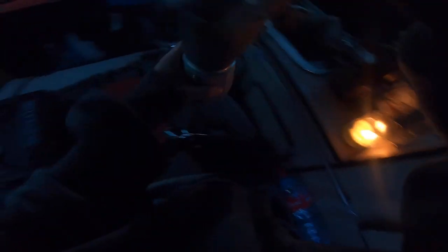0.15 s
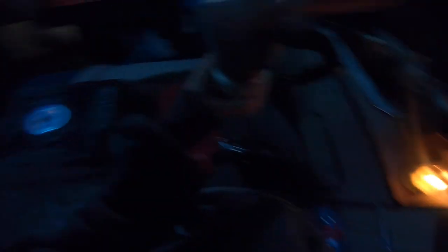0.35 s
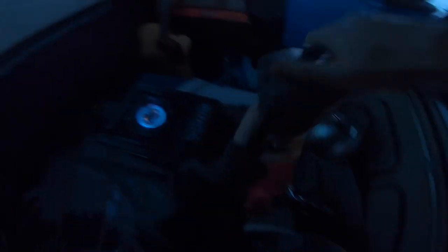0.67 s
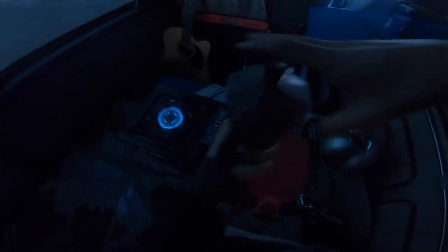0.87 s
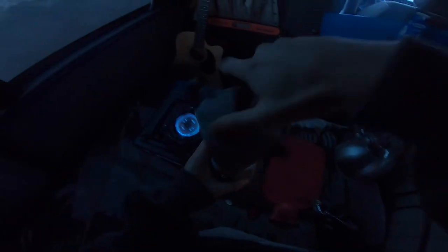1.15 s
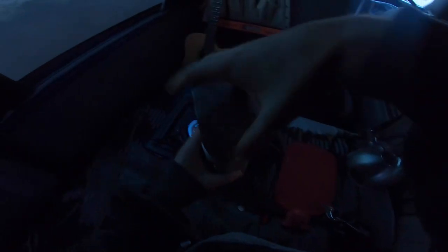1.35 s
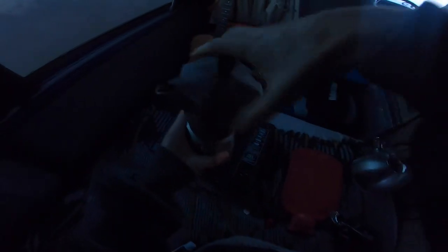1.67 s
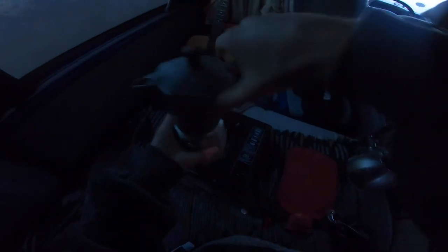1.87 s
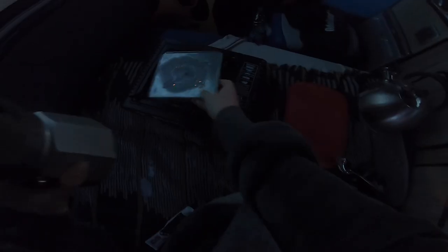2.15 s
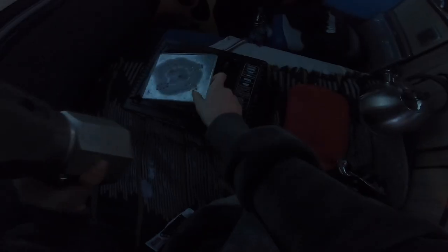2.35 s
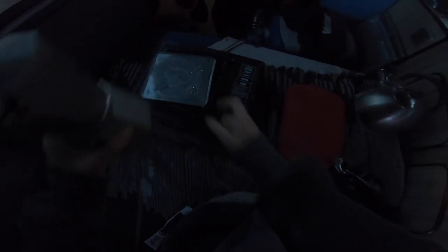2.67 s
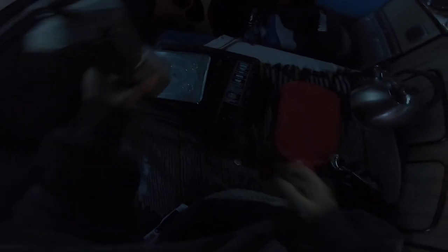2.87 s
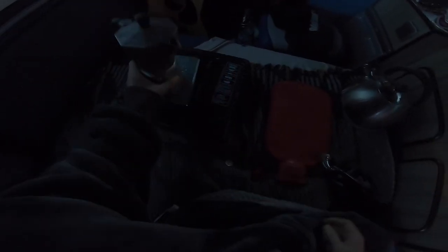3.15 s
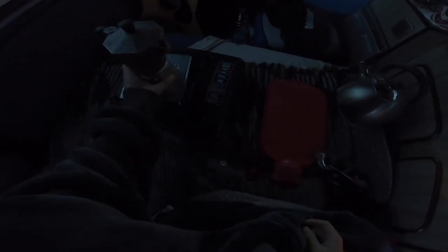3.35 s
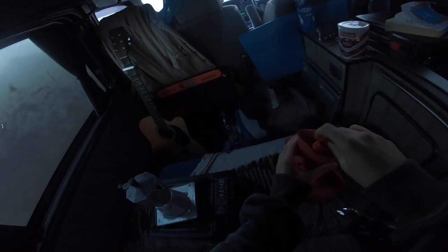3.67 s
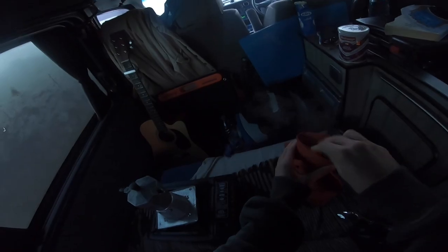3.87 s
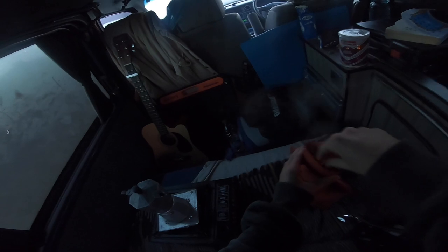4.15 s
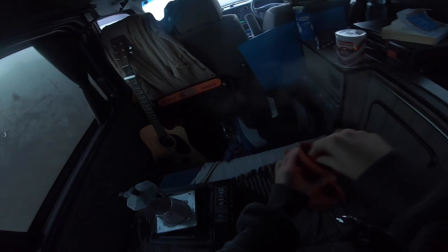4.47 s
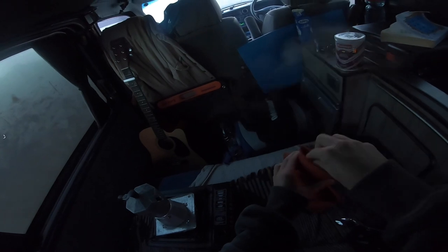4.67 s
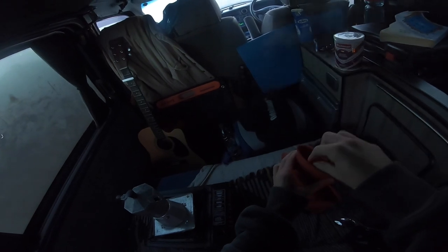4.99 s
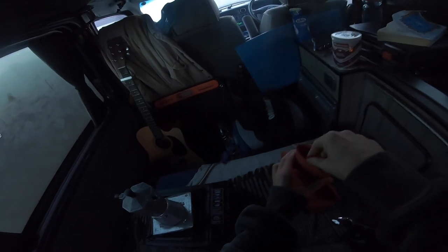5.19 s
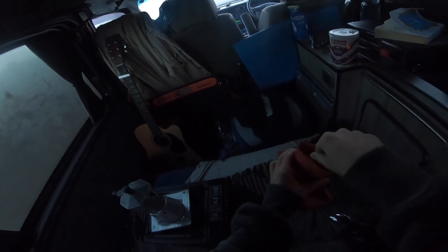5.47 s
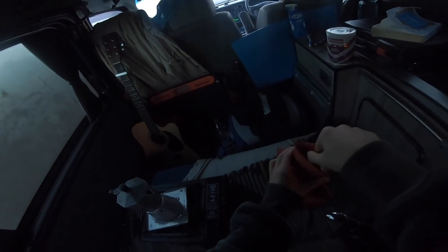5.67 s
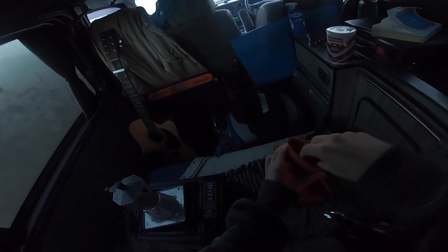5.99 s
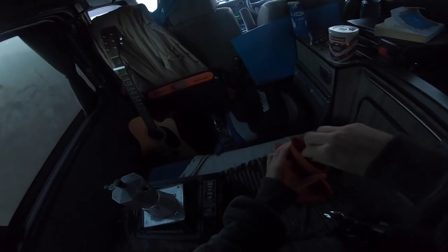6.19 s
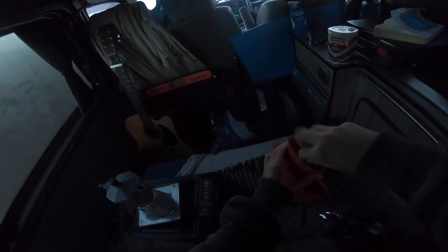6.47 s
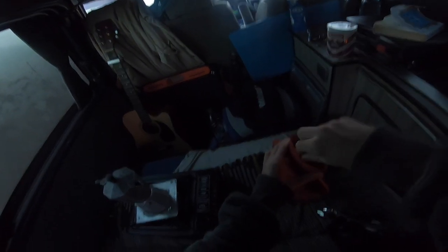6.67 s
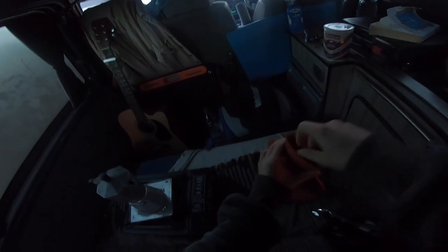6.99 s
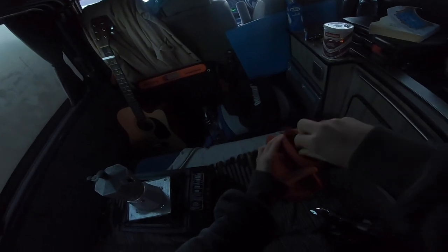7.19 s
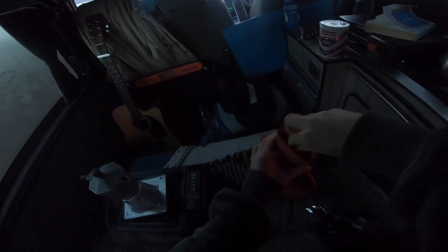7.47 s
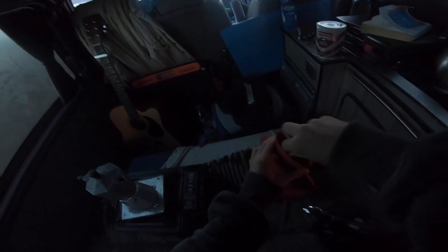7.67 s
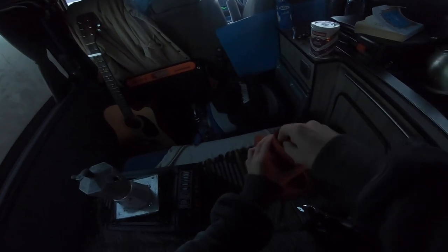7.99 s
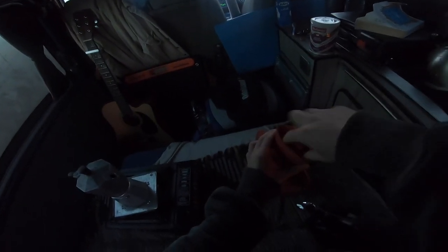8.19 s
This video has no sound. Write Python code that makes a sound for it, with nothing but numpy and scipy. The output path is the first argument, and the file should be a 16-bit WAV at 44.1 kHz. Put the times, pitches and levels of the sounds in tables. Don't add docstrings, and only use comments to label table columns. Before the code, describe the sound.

Inside a small van, faint gas hiss, metallic pot scrapes and clacks, loud lid clatter, then soft plastic ticking and rubbery rubbing over low rumble.

```python
import sys
import numpy as np
from scipy import signal
from scipy.fft import rfft, irfft, next_fast_len
from scipy.io import wavfile
from scipy.ndimage import uniform_filter1d, map_coordinates

SR = 44100
rng = np.random.default_rng(int(sys.argv[2]) if len(sys.argv) > 2 else 0)


def to_linear_factor(level_db):
    exponent = np.asarray(level_db, float) / 20
    return 10 ** exponent


def dump(signal):
    limited = np.clip(np.atleast_2d(signal).T, -1, 1)
    pcm = np.round(limited * 32767).astype(np.int16)
    wavfile.write(sys.argv[1], SR, pcm)


N = 367787
TIME = np.arange(N) / SR

# (frequency [Hz], level [dB], t60 [s])
POT_MODES = [(2152, 1.5, .06), (5510, -11, .04), (3170, 0, .055), (3650, -11, 0.06), (4540, -17, .05)]
# (frequency [Hz], level [dB], t60 [s])
POT_HOLLOW = [(371.5, 10, 0.03), (168.4, -8, 0.047), (710, -6, 0.037)]
# (frequency [Hz], density [dB per Hz])
LID_COLOUR = [(59, -47), (100, -14), (281, -17.5), (429, -12.5), (654, -20), (998, 1), (1160, -15.5),
              (1340, 0.5), (1880, -0.5), (2220, 1), (3120, 3), (9740, -25.5), (15500, -62.5)]
# (frequency [Hz], level [dB], t60 [s])
THUMP = [(62.4, 1, 0.17), (99, -2, 0.095)]
# (frequency [Hz], level [dB], t60 [s])
STOPPER = [(790, -12, 0.013), (1528, -17.5, 0.018), (1950, -4.5, 0.0082), (3914, -27, 0.027)]
# (frequency [Hz], level [dB], t60 [s])
RUBBER = [(308.5, 2, 0.04), (218, 1.5, 0.024), (399, 0, 0.016)]


def rms_one(x):
    return x / np.sqrt(np.mean(x ** 2) + 1e-20)


def at_hz(points, hz):
    points_hz, points_db = np.transpose(points)
    return np.interp(np.log(hz + 1), np.log(points_hz), points_db)


def high(x, hz, order=2):
    return signal.sosfilt(signal.butter(order, hz, "high", fs=SR, output="sos"), x)


def brightened(x, hz, db):
    low = signal.sosfilt(signal.butter(3, hz, fs=SR, output="sos"), x)
    return low + high(x, hz, order=3) * to_linear_factor(db)


def coloured(x, spectrum, size=4096):
    bins_hz = np.arange(size // 2 + 1) * SR / size
    cepstrum = irfft(np.log(to_linear_factor(at_hz(spectrum, bins_hz))))
    cepstrum[1:size // 2] *= 2
    cepstrum[size // 2 + 1:] = 0
    taps = irfft(np.exp(rfft(cepstrum)))
    return signal.fftconvolve(x, taps / np.sqrt(np.sum(taps ** 2)))[:len(x)]


def drift(rate):
    knots = rng.standard_normal(4000)
    return map_coordinates(knots, [TIME * rate * 2 + 2], order=3)


def smoothed(gain):
    return signal.lfilter([.02], [1, -.98], gain)


def strokes(tables, column):
    out = np.zeros(N)
    for rows in tables:
        s, db = np.array(rows)[:, 0], np.array(rows)[:, column]
        active = (TIME >= s[0]) & (TIME < s[-1])
        out += to_linear_factor(np.interp(TIME, s, db)) * active
    return smoothed(out)


def swells(start, full, release, db, fall, rise_db):
    t = TIME[::20, None]
    rise = rise_db * np.clip((full - t) / (full - start), 0, 1)
    level = db - rise - fall * np.clip(t - release, 0, 1)
    gain = np.sum(to_linear_factor(level) * (t >= start), axis=1)
    return smoothed(np.repeat(gain, 20)[:N])


def grains(per_s, spread_db):
    sizes = to_linear_factor(spread_db * np.minimum(rng.exponential(1, N), 4)) * rng.choice([-1, 1], N)
    return rms_one(sizes * (rng.random(N) < per_s / SR))


def resound(x, modes, damping=0.98):
    out = np.zeros(len(x))
    for k, (hz, db, t60) in enumerate(modes):
        r = to_linear_factor(-60 / (t60 * damping * SR))
        w = 2 * np.pi * hz / SR
        ring = signal.lfilter([0, np.sin(w)], [1, -2 * r * np.cos(w), r * r], x + 1e-18)
        out += (-1) ** k * to_linear_factor(db) * ring
    return out


def bands(x, peaks, apart=0.47):
    t = TIME[:6000]
    hz, width, db = np.transpose(peaks)[:, :, None]
    phases = apart * rng.uniform(-0.69, 1, (2, len(peaks), 1))
    decay = to_linear_factor(db) * width * np.exp(-np.pi * width * t)
    taps = np.sum(decay * np.sin(2 * np.pi * hz * t + phases), axis=1)
    taps /= np.sqrt(np.mean(np.sum(taps ** 2, axis=1)))
    return signal.fftconvolve(x[None], taps, axes=1)[:, :N]


def struck(modes, uneven_db, length_s, rise_s):
    t = TIME[:int(length_s * SR)]
    out = np.zeros(len(t))
    for hz, db, t60 in modes:
        level = db + uneven_db * rng.standard_normal() - 60 * t / t60
        out += to_linear_factor(level) * np.sin(2 * np.pi * hz * t)
    out *= 1 - np.exp(-t / rise_s)
    return out / np.abs(out).max()


def crack(spectrum, t60, click_db, bright_db):
    t = TIME[:4000]
    burst = rng.standard_normal(len(t)) * to_linear_factor(-60 * t / t60)
    burst[0] = -to_linear_factor(click_db)
    out = brightened(coloured(burst, spectrum), 4600, bright_db)
    return out / np.abs(out).max()


def panned(x, pan_db):
    return np.array([x * to_linear_factor(pan_db / 2), x * to_linear_factor(-pan_db / 2)])


def add(out, s, sound, pan_db):
    i = round(s * SR)
    out[:, i:i + len(sound)] += panned(sound, pan_db)[:, :N - i]


def stereo_noise(spectrum, patchy_db, peaks=(), peak_db=0):
    # (frequency [Hz], left-right likeness [1])
    likeness = [(60, 0.71), (180, 0.1), (550, -7.5), (1650, 0.27), (4970, 0.97), (15000, -2)]
    size = next_fast_len(N)
    hz = np.arange(size // 2 + 1) * SR / size
    resonances = sum(to_linear_factor(db + peak_db) / (1 + (2 * (hz - f) / w) ** 2) for f, w, db in peaks)
    gain = to_linear_factor(at_hz(spectrum, hz)) * (1 + resonances)
    alike = np.clip(at_hz(likeness, hz), 0, 1)
    mid, side = rfft(rng.standard_normal((2, size))) * gain * np.sqrt([1 + alike, 1 - alike])
    noise = irfft([mid + side, mid - side], size)[:, :N]
    return rms_one(noise * to_linear_factor(patchy_db * drift(9.3)))


def flame():
    # (time [s], level [dB])
    hiss_level = [
        [(0, -61.5), (.76, -64.5), (.82, -70.5), (1.06, -75), (1.37, -70), (1.46, -79.5), (2.0, -70.5),
         (2.08, -63), (2.25, -63.5)],
        [(2.7, -63), (3.0, -66), (3.3, -66.5)],
    ]
    # (frequency [Hz], density [dB per Hz])
    hiss_colour = [(59, -48), (110, -35), (170, -8), (299, 2.5), (568, -5), (1080, -5), (2470, -13),
                   (2970, -12), (5300, -16.5), (6200, -13.5), (6930, -24.5), (8600, -28.5), (10300, -49),
                   (14000, -80)]
    # (time [s], pitch [Hz], level [dB])
    whistle = [
        [(0, 6350, -61), (.035, 6600, -61), (.075, 6100, -60), (.1, 6000, -63), (.13, 6600, -64),
         (.165, 6650, -65), (.2, 6300, -70), (.3, 6150, -64), (.42, 6100, -72)],
        [(.46, 5900, -72), (.52, 6000, -64), (.55, 6150, -62), (.6, 5900, -64), (.68, 5850, -65),
         (.72, 6100, -62), (.79, 6080, -72)],
    ]
    hiss = strokes(hiss_level, column=1) * to_linear_factor(9.5) * stereo_noise(hiss_colour, patchy_db=4.5)
    s, hz, _ = np.vstack(whistle).T
    pitch = uniform_filter1d(np.interp(TIME, s, hz), size=500) + 90 * drift(250)
    phase = 2 * np.pi * np.cumsum(pitch) / SR
    return hiss + strokes(whistle, column=2) * np.sin(phase) * to_linear_factor(4 * drift(50))


def cabin_noise():
    # (frequency [Hz], density [dB per Hz])
    colour = [(13, -30.5), (22, -2), (59, 1), (99, -27), (153, -3), (286, -2), (551, -15.5), (765, -8),
              (1060, -18), (1940, -8.5), (2470, -18.5), (3940, -15), (6980, -24.5), (9430, -20),
              (10600, -25.5), (12700, -33.5), (13300, -46), (15000, -53.5)]
    # (frequency [Hz], width [Hz], level [dB])
    peaks = [(743, 45, -4), (1542, 85, -1), (3820, 320, -10), (4880, 55, -5), (7140, 24, -5.5)]
    airy_s, hush_s = 3.68, 3.58
    noise = to_linear_factor(-65) * stereo_noise(colour, 0.99, peaks, peak_db=3.5)
    noise = brightened(noise, 8000, -16 * (TIME < airy_s))
    noise = brightened(noise, 3500, -12 * ((TIME > hush_s) & (TIME < airy_s)))
    lull_db = -6 * ((TIME > 2.0) & (TIME < 3.45))
    return brightened(noise * to_linear_factor(lull_db), 75, -lull_db)


def chatter(per_s, spectrum, cycles, count=16):
    slips = grains(per_s, spread_db=5.0)
    dealt = rng.integers(0, count, N)
    out = np.zeros(N)
    for k, hz in enumerate(np.geomspace(1300, 4200, count)):
        mode = (hz, at_hz(spectrum, hz) + 20 * np.log10(hz), cycles / hz)
        out += resound(slips * (dealt == k), [mode])
    return rms_one(out)


def pot_thread():
    # (start [s], full [s], release [s], grind level [dB], decay [dB per s])
    turns = [
        (0.195, 0.253, 0.33, -40, 212),
        (0.592, 0.694, 0.76, -41, 900),
        (1.086, 1.162, 1.245, -40, 266.5),
        (1.497, 1.562, 1.636, -37, 600),
    ]
    # (start [s], length [s], grind level [dB], hollow level [dB])
    fumbles = [
        (0, 0.011, -56, -50.5),
        (0.037, 0.15, -68, -60.5),
        (0.389, 0.011, -68, -44),
        (0.796, 0.094, -66, -45),
        (1.291, 0.15, -72, -66),
        (1.683, 0.038, -81, -46.5),
    ]
    # (frequency [Hz], density [dB per Hz])
    colour = [(290, -7), (500, 1.5), (1390, -2), (2100, -4.5), (3190, -4.5), (4020, -14), (6000, -5),
              (7030, -15.5), (9650, -16), (11000, -37.5), (15500, -60)]
    # (frequency [Hz], width [Hz], level [dB])
    singing = [(1650, 130, -10), (2400, 350, -5.5), (3440, 250, -14.5), (4530, 170, -14.5), (6045, 100, -9),
               (7600, 130, -18), (8660, 91, -27), (9610, 200, -17)]
    hollow_rise_db, fumble_fall = 17.5, 400
    slips = grains(9000 * to_linear_factor(4 * drift(70)), spread_db=2.3)
    grind = to_linear_factor(-6) * coloured(slips, colour)
    grind += to_linear_factor(-12) * rms_one(resound(slips + 1.2 * grains(140, spread_db=4.0), POT_MODES))
    grind = grind + to_linear_factor(-2.5) * chatter(800, colour, cycles=33)
    grind += to_linear_factor(-8) * bands(slips, singing)[0]
    jolts = signal.lfilter([1], [1, -.9], grains(160, spread_db=3.5))
    hollow = rms_one(resound(jolts, POT_HOLLOW))
    start, full, release, db, fall = np.transpose(turns)
    grind_gain = swells(start, full, release, db, fall, rise_db=23)
    hollow_gain = swells(start, release, release, db + 3, fall, hollow_rise_db)
    s, length, db, hollow_db = np.transpose(fumbles)
    grind_gain += swells(s, s + length / 2, s + length, db, fumble_fall, rise_db=4)
    hollow_gain += swells(s, s + length, s + length, hollow_db, fumble_fall, hollow_rise_db)
    return panned(grind_gain * grind + hollow_gain * hollow, 0.67)


def pot_knocks():
    # (time [s], peak [dB], hollow level [dB], ring level [dB])
    base_knocks = [(0.149, -39, -33, -34), (.213, -38, -35, -25), (0.3315, -20.5, -42, -12.5),
                   (0.356, -15.5, -20.5, -11.5), (0.526, -37, -36.5, -36), (0.603, -37.5, -25.5, -39),
                   (.727, -24, -33, -20), (0.743, -26.5, -28, -6), (.755, -50, -28, -21),
                   (0.872, -26, -38, -23), (0.882, -17.5, -23, -11), (0.904, -48, -44, -19),
                   (1.1119, -26, -33, -21), (1.123, -29, -37, -20), (1.173, -27, -23.5, -22),
                   (1.21, -36, -27, -20), (1.417, -27.5, -35.5, -11), (1.509, -14.5, -23.5, -26),
                   (1.747, -47, -47, -26), (1.897, -15, -19.5, -18), (1.9056, -4, -28.5, -26),
                   (1.91, -12.5, -22.5, -11.5)]
    # (time [s], peak [dB], hollow level [dB], ring level [dB])
    top_knocks = [(0.4228, -15.5, -38, -6.5), (0.846, -43, -42, -1), (1.084, -41, -45.5, -21),
                  (1.091, -41, -43, -29), (1.149, -38, -38, -2), (1.163, -26, -30, -8.5),
                  (1.19, -17, -24, -15), (1.232, -20.5, -32.5, -10.5), (1.566, -13, -32, -5),
                  (1.67, -27, -36, -14), (1.838, -24.5, -30, -4.5), (1.842, -18, -29.5, -9),
                  (1.865, -10.5, -24.5, -17.5), (1.954, -9, -27.5, -22), (2.04, -41, -43, -13),
                  (2.0458, -14.5, -70, -12)]
    # (frequency [Hz], density [dB per Hz])
    colour = [(240, -18.5), (400, 0), (942, -0.5), (1960, 3), (3460, -6.5), (6190, -13), (7100, -23),
              (9210, -29.5), (10700, -42), (15500, -47)]
    # (frequency [Hz], level [dB], t60 [s])
    treble = [(6130, 3.5, .022), (6420, -6.5, .02), (7720, -4, .04), (8040, -6.5, 0.019), (9570, -6, 0.023)]
    # (frequency [Hz], level [dB], t60 [s])
    push = [(165.3, 0, 0.096)]
    # (time [s], left over right [dB])
    place = [(.15, 2), (.33, 8.5), (.43, 5.5), (.52, 0), (1.19, -3.5), (1.5, 1.5), (2.05, 2.5)]
    far_half_db = -7.5
    out, pushes, taps = np.zeros((2, N)), np.zeros((2, N)), np.zeros(N)
    knocks = [row + (0, far_half_db) for row in base_knocks]
    knocks += [row + (far_half_db, 0) for row in top_knocks]
    for s, db, hollow_db, ring_db, base_db, top_db in sorted(knocks):
        pan_db = np.interp(s, *np.transpose(place))
        bright_db = 0.6 * (db + 24)
        ring_db = db + ring_db + 2.5
        add(out, s, to_linear_factor(db - 1) * crack(colour, 0.034, 19, bright_db), pan_db)
        add(out, s, to_linear_factor(ring_db + base_db) * struck(POT_MODES[:2], 0.9, .15, .0004), pan_db)
        add(out, s, to_linear_factor(ring_db + top_db) * struck(POT_MODES[2:], 3.5, .15, .0004), pan_db)
        add(out, s, to_linear_factor(hollow_db + 1) * struck(POT_HOLLOW, 4.5, .1, 0.00175), 0)
        add(pushes, s, to_linear_factor(db + hollow_db - 7) * struck(push, 0, .1, 0.0071), 0)
        taps[round(s * SR)] = to_linear_factor(-12 + 1.9 * db)
    out += panned(resound(taps, treble), 2.5)
    return high(out, 164, order=4) + high(pushes, 120, order=4)


def snaps():
    # (time [s], peak [dB], frequency [Hz], t60 [s])
    contacts = [(0.3316, -24, 2000, .005), (0.845, -41, 5500, .06), (0.8845, -17, 1900, .004),
                (1.112, -28, 1500, .005), (1.1735, -21, 1400, .005), (1.1905, -18, 2500, .004),
                (1.418, -36, 3170, .06), (1.5095, -16, 1900, .004), (1.535, -38, 3170, .07),
                (1.537, -45, 5800, .05), (1.61, -36, 3170, .09), (1.632, -36, 3170, .07),
                (3.3155, -7, 2800, .004), (3.452, -33, 1400, .1), (3.575, -30, 3763, .14),
                (7.745, -52, 1950, .04), (7.93, -48, 1950, .04)]
    out, t = np.zeros((2, N)), TIME[:6000]
    for s, db, hz, t60 in contacts:
        add(out, s, -to_linear_factor(db - 60 * t / t60) * np.sin(2 * np.pi * hz * t), 1.5)
    return out


def sheet(spectrum, t60, count=160):
    t = TIME[:8000]
    place, left, right = rng.random((3, count, 1))
    hz = 600 + 9000 * place ** 1.1
    decay_db = 60 * t / t60 * np.sqrt(hz / 2000)
    modes = to_linear_factor(at_hz(spectrum, hz) - decay_db) * np.sin(2 * np.pi * hz * t)
    taps = np.array([np.sum(modes * (ear - .25), axis=0) for ear in (left, right)])
    return taps / np.sqrt(np.mean(np.sum(taps ** 2, axis=1)))


def lid_drag():
    start_s = [2.253, 2.285, 2.455, 2.517, 2.615, 2.79, 2.945, 3.02, 3.075, 3.31, 3.36, 3.414, 3.511, 3.535]
    # (length [s], rattle level [dB], decay [dB per s], brightness [dB])
    drags = [(0.018, -24.5, 204, 0), (0.1, -25, 199, -9.5), (0.047, -32.5, 400.5, -21),
             (0.072, -21, 250.5, -3), (0.041, -29.5, 184, 0), (0.021, -39, 190, -26),
             (.025, -47.5, 202, -39), (0.021, -49.5, 200.5, -38), (.04, -54.5, 201, -36),
             (0.03, -20.5, 289.5, -8), (.03, -42, 126.5, -16), (0.055, -32.5, 207.5, -16),
             (0.011, -24, 304.5, -14), (0.02, -22.5, 454.5, -16.5)]
    modes_hz = [344, 520, 696, 947, 1030, 1338, 1480, 1753, 1815, 1857, 1884, 2412, 2457, 2919, 3005, 3119,
                3284, 3356, 3450, 3656, 3725, 3988, 4430, 4581, 4915, 5125, 5599, 6240, 6600, 7784, 8737]
    # (level [dB], t60 [s])
    modes_ring = [(-20, 1.1), (-22, .9), (-24, .5), (-17, .5), (-16, .25), (-14, 1.2), (-9, .4), (-12, .4),
                  (-2, .4), (-9, .45), (-4, 1.1), (-15, .9), (-12, .4), (-13, .4), (-13, .8), (-13, .35),
                  (-13, .4), (-12, .6), (-8, .7), (-3, .75), (-14, 1.2), (-9, .75), (-17, .4), (-10, .55),
                  (-15, .6), (-14, .4), (-12, .4), (-15, .4), (-16, .55), (-17, .33), (-18.5, .2)]
    # (frequency [Hz], width [Hz], level [dB])
    sliding = [(1036, 60, -15.5), (1340, 36, -7), (1890, 39.5, 6), (2592, 60, 0), (3025, 49, 0),
               (3220, 22.3, -2.5), (3655, 45, 4.5), (4024, 38, -9), (1490, 20, -3.5), (4810, 32, -12.5),
               (5100, 15, -12), (5480, 120, -14), (5930, 42, -11.5), (6400, 36, -16)]
    # (frequency [Hz], width [Hz], level [dB])
    loaded = [(1351, 50, -9), (1630, 50, -6), (2000, 56, -6.5), (2420, 260, -12.5), (2910, 120, -6),
              (3130, 49, -2.5), (3360, 90, -1), (3740, 60, -1), (3990, 18, -2), (4100, 45, -11),
              (4790, 44, -6.5), (5220, 27, -11), (5500, 80, -10), (6120, 120, -12.5)]
    ring_from_s, release_s, clear_s = 2.54, 2.64, 2.75
    sheet_fade_s, held_s, pot_down_s, still_s = 2.8, 3.15, 3.2, 3.585
    s = np.array(start_s)
    length, db, fall, bright_db = np.transpose(drags)
    contacts = grains(5000 * to_linear_factor(2.5 * drift(90)), spread_db=2.5)
    contacts *= swells(s, s + 0.0069, s + length, db, fall, rise_db=6)
    stroke = np.clip(np.searchsorted(s, TIME) - 1, 0, None)
    clatter = brightened(coloured(contacts, LID_COLOUR), 4790, bright_db[stroke] + 15.5)
    close = signal.fftconvolve(contacts[None], sheet(LID_COLOUR, 0.47), axes=1)[:, :N]
    close *= to_linear_factor(-440 * np.clip(TIME - sheet_fade_s, 0, 1))
    modes = np.column_stack([modes_hz, modes_ring])
    free = panned(to_linear_factor(-47) * resound(contacts * (TIME > ring_from_s), modes), 4.2)
    add(free, release_s, to_linear_factor(-23.5) * struck(modes, 0.56, 1, 0.028), 4)
    free *= to_linear_factor(-300 * np.clip(TIME - held_s, 0, 1))
    damped = to_linear_factor(-3.5) * bands(contacts * (TIME < clear_s), sliding)
    damped += to_linear_factor(-5) * bands(contacts * (TIME > pot_down_s), loaded)
    damped *= to_linear_factor(-400 * np.clip(TIME - still_s, 0, 1))
    return panned(to_linear_factor(-7) * clatter, 1.4) + free + (to_linear_factor(-17) * high(close, 440) + damped) * to_linear_factor([[2], [-2]])


def lid_blows():
    # (time [s], peak [dB], pot ring level [dB], low thump level [dB])
    blows = [(2.253, -4.5, -35, -45), (2.307, -10.5, -19, -57), (2.347, -6.5, -8.5, -49.5),
             (2.455, -20.5, -15.5, -71), (2.516, -2.5, -16, -41.5), (3.309, -19, -10, -46.5),
             (3.3145, -2, -25, -35.5), (3.328, -6, -22.5, -58.5), (3.416, -17, -15, -40.5),
             (3.512, -8.5, -16, -57.5), (3.537, -5, -13, -50.5), (3.563, -23, -25, -39.5)]
    # (frequency [Hz], level [dB], t60 [s])
    settling = [(2153, 1, 0.057), (2643, -22.5, 0.12), (2939, -35.5, 0.33), (3320, -22.5, 0.19),
                (3763, -9, 0.13), (4600, -28.5, 0.11), (5740, -28.5, 0.13), (5669, -28, 0.23)]
    out = np.zeros((2, N))
    add(out, 3.562, to_linear_factor(-20) * struck(settling, 0, .25, .003), 3)
    for s, db, ring_db, thump_db in blows:
        add(out, s, to_linear_factor(db - 3.5) * crack(LID_COLOUR, 0.066, 19, .1), 4)
        add(out, s, to_linear_factor(db + ring_db) * struck(POT_MODES, 3.1, .2, 0.00043), 4)
        add(out, s + 0.0066, to_linear_factor(thump_db + 7) * struck(THUMP, 2.5, .4, 0.0029), 0)
    return out


def bottle_rub():
    # (start [s], full [s], release [s], rub level [dB], sloshing body level [dB])
    grips = [(3.7, 3.704, 3.74, -67.5, -82), (3.803, 3.929, 4.3, -69, -63), (4.47, 4.593, 4.75, -62, -59),
             (4.845, 5.009, 5.1, -73, -77), (5.29, 5.345, 4.96, -67.5, -76), (5.803, 5.9, 6.3, -76, -75),
             (6.294, 6.399, 6.54, -63.5, -66), (6.663, 6.783, 6.9, -71, -62.5),
             (7.02, 7.055, 6.95, -69, -82), (7.398, 7.497, 7.5, -64.5, -84),
             (7.704, 7.722, 7.5, -64.5, -92.5), (7.86, 7.914, 7.99, -67, -66.5),
             (7.981, 7.997, 7.86, -81, -69.5)]
    # (frequency [Hz], density [dB per Hz])
    colour = [(260, -54), (450, -16), (576, -33), (812, 3), (1040, 2), (1900, -5.5), (2600, -2.5),
              (4000, -6.5), (5900, -8.5), (6800, -18), (12000, -35), (15600, -59), (22000, -120)]
    grip_fall, grip_rise_db = 150, 12
    slips = grains(7000 * to_linear_factor(4.5 * drift(35)), spread_db=2.6)
    rub = coloured(slips, colour) + to_linear_factor(-4) * rms_one(resound(slips, STOPPER))
    jolts = signal.lfilter([1], [1, -.9], grains(220, spread_db=3.5))
    wobble = rms_one(resound(jolts, RUBBER))
    *times, rub_db, body_db = np.transpose(grips)
    rub *= swells(*times, rub_db, grip_fall, grip_rise_db)
    return panned(rub, -1.4) + wobble * swells(*times, body_db, grip_fall, grip_rise_db)


def stopper_ticks():
    # (time [s], peak [dB], main pitch [Hz], rubber body level [dB])
    soft = [(4.337, -19, 2910, -53), (4.46, -31.5, 1430, -39), (4.868, -34.5, 1506, -65),
            (5.358, -34, 2060, -52), (5.427, -37.5, 1940, -69), (5.5105, -20.5, 2900, -44),
            (6.684, -31, 1950, -47), (7.256, -40, 802, -72), (7.919, -40, 1820, -72)]
    firm = [(3.705, -45, 1560, -59), (3.74, -37, 2800, -76), (4.026, -36, 743, -40), (4.692, -38, 800, -69),
            (5.02, -24, 1950, -50), (5.061, -39.5, 2670, -50), (6.21, -40, 2000, -75),
            (6.725, -32.5, 742, -40), (7.1, -34, 1575, -86), (7.471, -40.5, 1810, -82),
            (7.6, -36.5, 1836, -52), (7.877, -32, 1950, -46.5), (7.997, -31, 2020, -40)]
    sharp = [(4.728, -42, 1483, -62), (5.169, -32, 1990, -39.5), (6.444, -45.5, 1851, -56),
             (6.478, -42, 3160, -71), (6.574, -43, 1922, -67), (4.59, -49, 5600, -80),
             (6.603, -45, 9000, -73), (7.516, -40, 1934, -71)]
    faint = [(3.778, -60, 1560, -80), (3.941, -48, 1540, -77), (4.049, -44.5, 1490, -69),
             (4.293, -41, 837, -65), (4.802, -42, 806, -63), (4.705, -42, 2270, -80),
             (5.299, -59, 1950, -80), (5.616, -48, 743, -75), (6.063, -47.5, 1950, -75),
             (7.06, -49.5, 1820, -79), (7.303, -48, 1811, -55.5), (7.442, -56, 1802, -80),
             (7.715, -46.5, 1836, -82)]
    # (frequency [Hz], density [dB per Hz])
    colour = [(180, -57), (300, -2), (637, -6.5), (1970, 10), (2440, 2.5), (3020, 4), (3610, -3),
              (4690, -1.5), (9960, -21), (15000, -102)]
    kinds = (soft, -9.5), (firm, -2.5), (sharp, 8), (faint, -9.5)
    out = np.zeros((2, N))
    for s, db, hz, body_db, bright_db in sorted(row + (treble,) for rows, treble in kinds for row in rows):
        add(out, s, to_linear_factor(db - 6) * crack(colour, 0.054, 22, bright_db), -4.5)
        add(out, s, to_linear_factor(db - 11) * struck([(hz, 3.5, .02)] + STOPPER, 5.5, .08, 0.0017), -4.5)
        add(out, s, to_linear_factor(body_db - 2) * struck(RUBBER, 4.5, 0.074, 0.0025), 0)
    return out


def floor_bumps():
    # (time [s], level [dB])
    bumps = [
        (4.451, -61),
        (5.17, -67),
        (6.72, -65),
        (8.02, -50),
    ]
    out = np.zeros((2, N))
    for s, db in bumps:
        add(out, s, to_linear_factor(db) * struck(THUMP, 1.4, .4, .012), 0)
    return out


def van(x):
    t60_s, wall_cut_hz = 0.046, 11000
    t = TIME[:int(.3 * SR)]
    tails = rng.standard_normal((2, len(t))) * to_linear_factor(-60 * t / t60_s) * (t > .002)
    tails = signal.sosfilt(signal.butter(1, [500, wall_cut_hz], "band", fs=SR, output="sos"), tails)
    tails /= np.sqrt(np.sum(tails ** 2, axis=1, keepdims=True))
    return signal.fftconvolve(x, tails, axes=1)[:, :N]


def unlike_treble(things):
    scatter = rng.standard_normal(900) * to_linear_factor(-np.arange(900) * .025)
    scatter /= np.sqrt(np.sum(scatter ** 2))
    treble = high(np.convolve(things.mean(axis=0), scatter)[:N], 4200)
    return to_linear_factor(-.4) * treble * [[1], [-1]]


def scene():
    pot = pot_thread() + pot_knocks()
    lid = high(lid_drag() + lid_blows(), 50, order=4)
    bottle = bottle_rub() + stopper_ticks() + floor_bumps()
    things = pot + lid + bottle + snaps()
    return things + unlike_treble(things) + to_linear_factor(-10.5) * van(things) + flame() + cabin_noise()


def low_pass(x):
    return signal.sosfilt(signal.butter(12, 16020, fs=SR, output="sos"), x)


def record(dry):
    dull = signal.sosfilt(signal.butter(2, 12500, fs=SR, output="sos"), dry)
    dull = signal.sosfilt(signal.cheby2(10, 45, 15500, fs=SR, output="sos"), dull)
    fade = np.clip((TIME[-1] - TIME) / 0.072 + 0.26, 0, 1)
    return low_pass(dull * fade)


dry = scene()
out = record(dry)
dump(out)
```